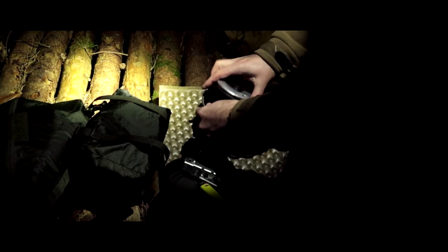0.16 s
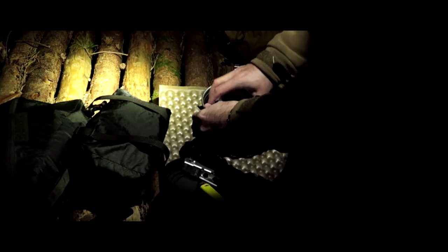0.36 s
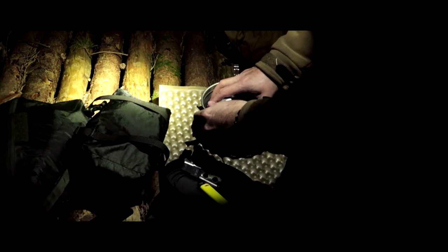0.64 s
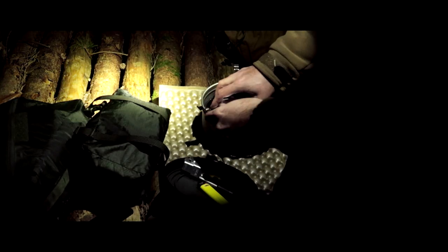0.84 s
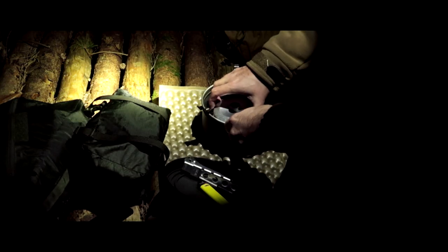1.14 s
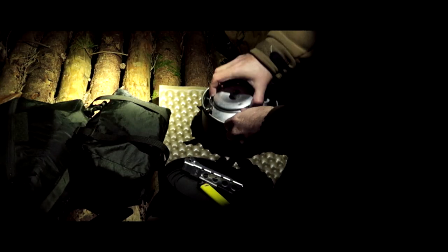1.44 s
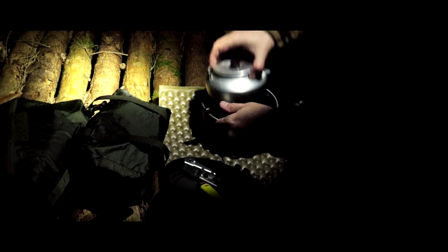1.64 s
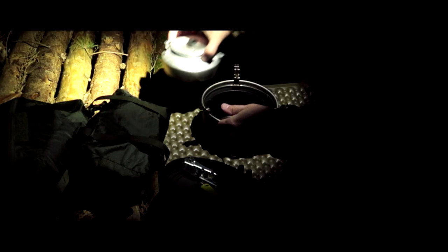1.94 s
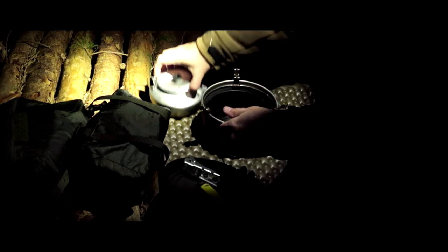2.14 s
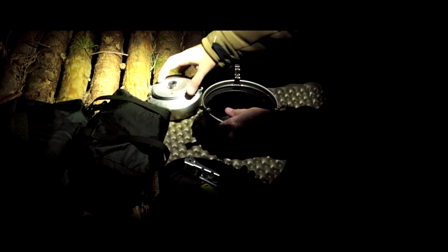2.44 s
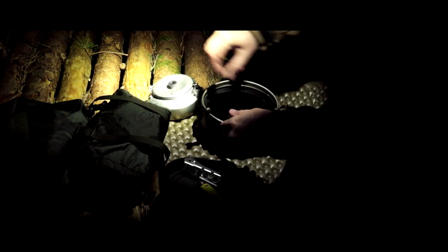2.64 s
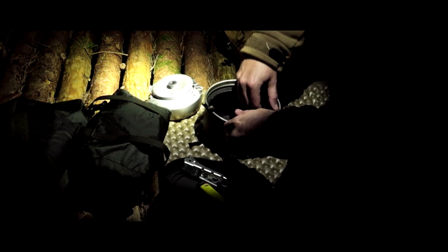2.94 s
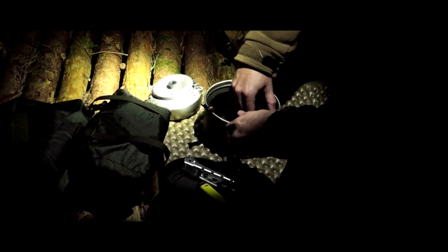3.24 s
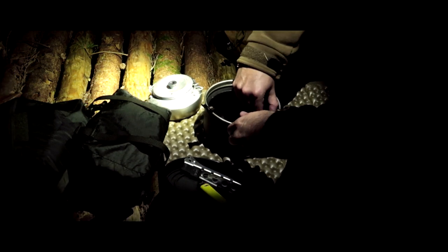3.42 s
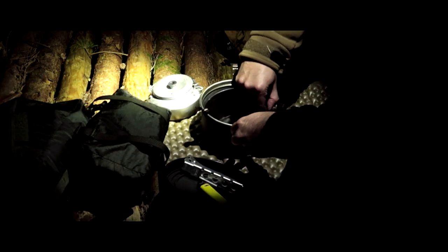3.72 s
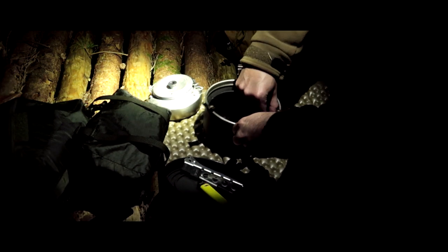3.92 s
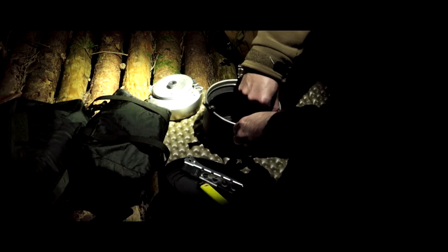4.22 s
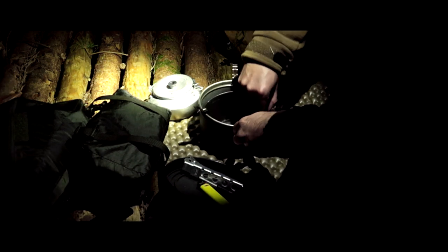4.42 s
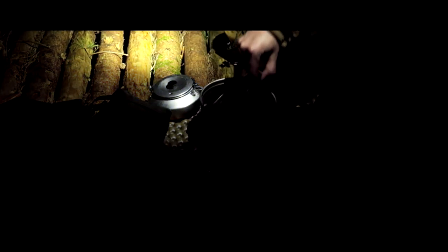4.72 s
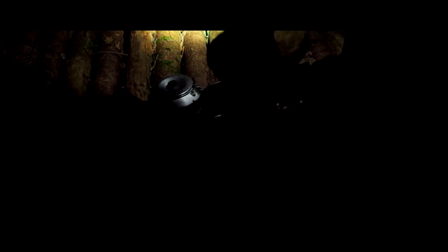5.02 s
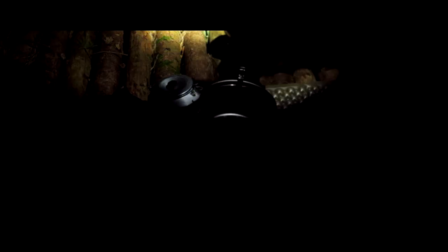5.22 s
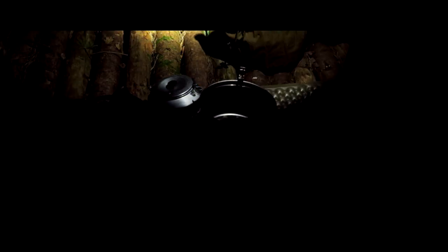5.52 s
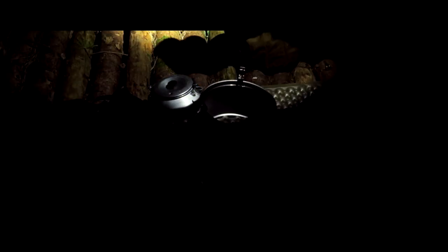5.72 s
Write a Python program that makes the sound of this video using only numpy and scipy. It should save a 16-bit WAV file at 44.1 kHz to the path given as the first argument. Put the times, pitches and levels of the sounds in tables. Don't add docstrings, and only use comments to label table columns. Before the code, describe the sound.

Close metallic clinks and scrapes with sleeve rustle, a kettle set down, a stove pried loose and clanging sharply against a pot, over quiet hiss.

```python
import sys
import numpy as np
from scipy import signal
from scipy.fft import rfft, irfft, next_fast_len
from scipy.io import wavfile

SR = 44100
rng = np.random.default_rng(int(sys.argv[2]) if len(sys.argv) > 2 else 0)


def level_to_linear(level):
    exponent = np.asarray(level, float) / 20
    return 10 ** exponent


def unload_audio(sound):
    columns = np.transpose(np.atleast_2d(sound))
    steps = np.round(np.clip(columns, -1, 1) * 32767)
    wavfile.write(sys.argv[1], SR, steps.astype(np.int16))


N = 258426
TAIL = 2 * SR // 5

# (time [s], peak [dB], favoured pitch [Hz], low body re peak [dB], sparkle re peak [dB])
KETTLE_HITS = [(.007, -36, 2090, -10, -22), (.042, -41, 2600, -34, -23), (.098, -47, 2000, -17, -9),
               (.251, -39, 1500, -14, -15.5), (.475, -48.5, 1020, 8, -12), (.504, -20, 1880, -14.5, -6.5),
               (.531, -32, 1570, -4.5, -30), (.538, -35, 3050, -8, -25), (.6925, -12, 1600, -4.5, -24),
               (.7, -15.5, 1500, 0.5, -22.5), (.716, -26, 1500, -3, -17), (.731, -34, 1200, 0, -35),
               (.742, -32.5, 1040, -5, -41), (.776, -38.5, 1030, 11, -38), (.797, -57, 1020, 21, -20),
               (1.213, -56.5, 1020, 16.5, -16), (1.284, -46, 1020, -6, -36), (1.431, -38.5, 1020, -5, -35),
               (1.454, -37, 1010, 0, -40), (1.494, -34, 1950, -10, -38), (1.518, -36.5, 2140, -15, -40),
               (2.248, -16, 1950, -6, -13), (2.264, -24, 1380, -4, -16), (2.274, -24.5, 1600, -8.5, -15),
               (2.285, -26, 1640, -1.5, -18), (2.298, -21.5, 1700, -7.5, -22),
               (2.462, -35, 1050, -0.5, -26), (2.478, -20.5, 1810, -11.5, -21),
               (2.495, -11.5, 2680, -10, -13), (2.535, -34.5, 2200, 4.5, -16),
               (2.542, -14.5, 1900, -13, -20)]
# (time [s], peak [dB], favoured pitch [Hz], low body re peak [dB])
STOVE_HITS = [(2.889, -56, 810, -18), (2.921, -41, 2060, -26), (2.958, -39, 2380, -4),
              (3.044, -31.5, 1600, -12.5), (3.083, -28.5, 1550, -8.5), (3.11, -31.5, 1230, -38),
              (3.169, -34.5, 1740, -14), (3.197, -30, 2040, -35), (3.212, -28, 1990, -10),
              (3.254, -37.5, 810, -31), (3.309, -60, 748, -19), (3.409, -40, 900, 1.5),
              (3.413, -31, 2080, -16), (3.441, -39, 1990, -27), (3.477, -27, 2000, -14),
              (3.517, -32.5, 2570, -16.5), (3.539, -41.5, 2480, -34), (3.764, -45, 720, -3),
              (3.833, -38, 1440, -16), (3.885, -38, 810, -26), (3.915, -36, 1010, -28),
              (3.929, -36, 2450, 0.0), (3.975, -39, 1100, -27), (4.019, -47, 2070, -28),
              (4.132, -28, 2450, -22), (4.165, -29.5, 2340, -37), (4.195, -39, 2240, -17),
              (4.207, -40.5, 2080, -21), (4.346, -44, 703, -6)]
# (time [s], peak [dB], favoured pitch [Hz], low body re peak [dB], sparkle re peak [dB])
POT_HITS = [(4.701, -23.5, 2060, -11, -14.5), (4.731, -8, 2100, -13, -22), (4.736, -4, 2780, -18, -21.5),
            (4.7425, -9.5, 3000, -21, -18), (4.77, -30, 2000, -15.5, -2), (4.777, -9, 1920, -18, -15),
            (4.782, -4.5, 2380, -18, -14.5), (4.789, -23, 2600, -28.5, -0.5), (4.802, -28, 2150, -14, -6),
            (4.824, -37, 2120, -19, -5), (4.838, -34.5, 2100, -18, -2), (4.86, -34.5, 1800, -20, -2.5),
            (4.865, -22, 2400, -38, -19.5), (4.9, -39, 3500, -32, -15), (4.91, -27, 3670, -37, -12),
            (4.934, -36, 2900, -26, -31), (5.021, -39, 3000, -29, -19)]
# (time [s], peak [dB], favoured pitch [Hz], low body re peak [dB])
KNOCKS = [(1.014, -39, 1530, -36), (1.329, -21, 1120, -33), (1.392, -35.5, 1020, -5.5),
          (3.184, -25.5, 1310, -14.5), (3.637, -31, 1350, -32), (3.716, -29, 2080, -7),
          (3.794, -31.5, 855, -7), (3.897, -16, 1080, -9), (3.954, -6.5, 2250, -23.5),
          (4.125, -21.5, 1550, -13.5), (4.231, -30.5, 1370, -15), (4.517, -18, 1310, -29),
          (4.659, -23.5, 2160, -21)]
# (time [s], peak [dB], sparkle re peak [dB])
ARM_HITS = [
    (5.131, -45.5, -40),
    (5.199, -39.5, -15),
    (5.222, -30.5, -9),
    (5.244, -36, -38),
    (5.267, -34, -14),
    (5.306, -36, -11),
    (5.326, -43, -34),
]

# (frequency [Hz], level [dB], T60 [s])
KETTLE_MODES = [(333, -8, 0.028), (372, 3.5, 0.037), (423, -4.5, 0.036), (806, -23, 0.1),
                (1430, -23.5, 0.044), (1990, 1, 0.026), (2190, 2, 0.056), (1092, -9, 0.032),
                (3057, 1.5, 0.053), (3990, -10, .07), (4830, 16, 0.081), (5420, 18, 0.085),
                (6670, -11, 0.069), (7440, -24, 0.044), (4520, 24, 0.06), (10100, 12.5, 0.11)]
STOVE_MODES = [(380, -4, 0.024), (597.4, -7, 0.14), (830, 14, 0.037), (1074, 0.5, 0.23), (1180, -21, 0.044),
               (1440, 6, 0.05), (1700, -2, 0.051), (2080, 18, 0.083), (2480, 19, 0.055), (3027, 11, 0.1),
               (3800, -21, .04), (4650, 27, 0.05), (5380, 25, 0.079), (6000, 25, .05), (6450, -4, 0.05),
               (6640, -25, 0.058)]
POT_MODES = [(347, -5.5, 0.035), (603, -3, 0.13), (830, -16, .06), (1085, -12.5, .1), (1150, -7, 0.064),
             (1750, 8.5, 0.29), (1900, 9, 0.074), (2136, 23.5, 0.035), (2160, 16, 0.095),
             (2420, -5.5, 0.071), (2600, 16, 0.063), (3060, -3, 0.047), (3050, 2, 0.083), (2880, 6, 0.037),
             (3400, 26, 0.036), (3260, -2.5, 0.08), (3930, 31, 0.015), (4810, 19, 0.24), (5840, 20.5, 0.11),
             (5420, 14.5, 0.14), (5300, 16.5, 0.13)]
GRIPPED_MODES = [(386, 3, 0.029), (617, 2.5, 0.099), (845, -51, 0.026), (1086, -16, 0.044),
                 (1230, 1, 0.024), (1472, 7, 0.025), (1720, 10.5, 0.0092), (2080, 14.5, 0.0083),
                 (2480, 2.5, 0.025), (3000, -3, 0.025), (4400, -2.5, 0.054), (5470, 20, 0.031)]
ARM_MODES = [(442, 0, 0.078), (1520, 6, 0.077), (2218, 6, 0.06), (2912, 4, 0.099), (3070, -7, .06),
             (3800, -1, 0.074), (4620, 22, .04), (5400, 22, .03), (6030, 34, 0.035), (6255, 17, .04),
             (8380, -3, .04), (9400, 1, 0.036)]
BAND_EDGES_HZ = [250, 700, 4000, 15000]
CROWD_T60_S = [0.06, 0.014, 0.016]
KETTLE_CRACK_DB = [-18.5, 0.5, 0.5]

# (time [s], peak [dB], frequency [Hz], until
# choked [s])
HELD_RINGS = [(.007, -38.5, 2190, 0.011), (.042, -38.5, 3190, 0.0071), (.043, -36, 2170, 0.013),
              (.505, -24, 1440, 0.0066), (.508, -24, 3150, 0.008), (.519, -39, 3320, 0.0048),
              (.504, -32.5, 5420, 0.0097), (.507, -31, 4660, 0.0067), (.51, -40, 6675, .015),
              (.694, -22, 734, 0.023), (.693, -20, 2190, 0.022), (.693, -22.5, 3204, 0.013),
              (.697, -27.5, 4587, 0.0054), (.697, -11, 370, 0.012), (2.249, -14, 3000, 0.0014),
              (2.249, -16.5, 464, 0.0029), (2.252, -21, 1360, .004), (2.254, -27, 4624, 0.0027),
              (2.265, -24, 3090, 0.017), (2.273, -21, 2200, 0.021), (2.301, -25, 2208, .011),
              (2.479, -30, 3080, .014), (2.495, -10.5, 2206, 0.0054), (2.495, -11, 3075, 0.0081),
              (2.497, -13, 353, 0.015), (2.513, -31, 2213, 0.012), (2.499, -28, 4820, 0.032),
              (2.542, -16.5, 2213, 0.013), (2.542, -20, 3034, 0.014), (3.714, -42, 710, 0.016),
              (3.764, -40, 707, 0.0074), (3.898, -18.5, 830, 0.029), (3.912, -23, 985, 0.021),
              (3.976, -39.5, 3020, 0.01), (4.521, -36, 1724, 0.043), (4.731, -9, 1910, .004),
              (4.7755, -4, 1930, 0.003), (4.782, -15, 5420, 0.0024), (4.866, -23.5, 3550, 0.015),
              (4.91, -30, 3720, .014), (5.018, -43, 2940, 0.028),
              (1.21, -36, 380, 0.016), (1.331, -29, 1180, 0.0087), (1.528, -50, 2800, .04),
               (1.355, -40.5, 1240, .05), (1.464, -35, 370, .008), (1.478, -31.5, 370, 0.0084),
               (1.331, -37, 1900, .005), (2.274, -21.5, 400, 0.014), (2.299, -25, 400, 0.016),
               (3.637, -35, 930, 0.004), (3.087, -34.5, 1222, 0.047), (3.087, -34, 312, 0.032),
               (3.197, -45, 5400, 0.033), (3.2, -40, 3050, 0.022), (3.415, -46.5, 6450, .01),
               (3.414, -46, 5400, .008), (3.484, -46.5, 5380, .022), (3.638, -36, 1450, .005),
               (3.795, -40.5, 1440, 0.011), (4.131, -42, 5400, 0.0062), (4.165, -45, 5400, .018),
               (4.169, -42, 4650, .015), (4.195, -40, 2150, .02), (4.519, -35.5, 603, 0.044),
               (4.518, -30, 1120, .012), (4.665, -49, 2000, .035), (4.78, -10.5, 2600, 0.012),
               (4.857, -29.5, 1664, 0.012), (4.81, -27, 2143, .04), (5.223, -30.5, 2912, .014),
               (5.31, -42, 2218, 0.026), (4.862, -30, 2150, .028), (4.864, -33, 2900, .035),
               (4.912, -36, 2950, .04), (4.79, -24, 1750, .015), (2.495, -25, 1770, .006),
               (2.287, -30, 3050, .018), (3.794, -38, 2100, .004)]
# (time [s], peak [dB], frequency [Hz])
FREE_RINGS = [(.515, -48, 8600), (1.522, -46, 1170), (3.086, -34, 597), (3.086, -43, 1977),
              (3.96, -37, 1085), (4.734, -23, 1751), (4.735, -23, 3385), (4.78, -20, 1706),
              (4.778, -24, 2066), (4.737, -35, 2780), (4.83, -36, 2700), (4.785, -39, 4172),
              (4.8, -25, 605), (4.79, -20, 2145), (4.91, -55, 15130), (4.92, -46, 3548), (4.742, -35, 4086),
              (4.735, -21.5, 1077), (4.735, -18, 603), (4.81, -36, 3045), (4.8, -33, 2526),
              (4.79, -44.5, 3553), (4.91, -43, 2073), (.235, -48, 2150)]
# (time [s], peak [dB], frequency [Hz])
LAST_RINGS = [
    (4.918, -49, 773),
    (4.911, -42, 1702),
    (4.87, -43, 2525),
]

# (time [s], length [s], level [dB rms], pitch [Hz])
SCRAPES = [(.01, 0.19, -48.5, 2180), (0.075, .09, -58, 5300), (0.452, 0.11, -45.5, 2000),
           (0.783, 0.38, -52.5, 1940), (2.24, 0.08, -36, 1860), (2.872, 0.17, -57, 2180),
           (2.875, 0.036, -57, 5050), (3.08, 0.054, -49, 1800), (3.183, 0.082, -49, 2000),
           (3.193, 0.056, -50.5, 5400), (3.403, 0.068, -54, 3200), (3.466, 0.052, -50, 3000),
           (3.71, 0.17, -52, 1960), (3.984, 0.078, -49, 2000), (4.144, .045, -47, 2380),
           (4.405, 0.14, -49.5, 2120), (4.534, 0.13, -47, 2260), (4.742, 0.049, -36, 2000),
           (4.791, .099, -41, 2000), (4.819, 0.054, -38.5, 6000), (4.88, .059, -40.5, 2200),
           (4.908, .016, -34, 8000), (3.893, 0.05, -38, 1750), (3.953, 0.015, -39, 5050),
           (0.501, .016, -31, 1100), (1.328, 0.016, -42, 1800), (4.727, .025, -23, 4300),
           (4.78, 0.023, -27, 4300), (3.165, 0.014, -51, 3000), (2.49, 0.012, -28, 1700),
           (5.204, 0.17, -57, 3400)]
# (time [s], peak [dB], frequency [Hz])
THUMPS = [(1.33, -35, 148), (2.226, -15, 183), (2.258, -23, 200), (3.044, -31, 186), (3.208, -26, 173),
          (3.476, -27, 226), (4.725, -25.5, 210), (4.842, -21, 262), (4.858, -21.5, 205),
          (4.865, -25, 123.6), (4.97, -33, 147)]
# (time [s], level [dB])
RUSTLE = [(0.0, -43), (.24, -52.5), (.5, -49.5), (.67, -45), (.86, -46), (1.06, -62.5), (1.48, -40),
          (1.65, -55), (2.94, -53), (3.08, -47), (3.23, -51), (3.56, -55.5), (4.51, -51), (4.63, -46.5),
          (4.73, -36), (4.85, -32), (4.99, -56.5), (5.86, -55.5)]
# (frequency [Hz], density [dB per Hz])
CLOTH = [(120, -30), (200, 6), (322, 4.5), (465, -1.5), (671, -4), (950, -11), (1060, -6), (2090, 0),
         (12600, -35), (16000, -30)]

# (frequency [Hz], density [dB per Hz])
NIGHT = [(15, -46.5), (25, -12.5), (53, -11), (70, -16), (92, -3), (124, -4.5), (142, -11.5), (357, -7.5),
         (507, -14), (684, -10), (2260, -25), (4100, -23.5), (14300, -40), (16300, -68)]
# (frequency [Hz], level [dB rms])
HUM = [(50, -62), (100, -58.5), (151, -62), (201, -69.5)]
# (time [s], peak [dB])
TICKS = [
    (1.119, -41),
    (1.88, -42),
    (5.399, -51),
]
# (frequency [Hz], side re mid [dB])
WIDTH = [(60, -20), (110, -54), (200, -35), (380, -43), (700, -45.5), (1290, -30), (2380, -24.5),
         (4400, -7), (8120, 0), (15000, -3)]
# (frequency [Hz], side re mid [dB])
NIGHT_WIDTH = [(60, -40.5), (110, -11), (200, -2.5), (380, 1), (700, -4), (1290, 1.5), (2380, 5), (4400, 0),
               (8120, 1), (15000, -2.5)]
# (frequency [Hz], gain [dB])
PRESENCE = [(5500, 0), (8000, -3.5), (12500, 2.5), (14800, -3), (16000, -14)]


def kettle():
    return struck(KETTLE_HITS, KETTLE_MODES, treble_hz=[4000, 8000], crack_db=KETTLE_CRACK_DB,
                  band_db=[-1.1, -3, -6], focus_db=1.5, reach=[2.4, 1.45], chatter_s=0.017)


def stove():
    rim_hz, rim_sparkle_db, sparkle_db_per_octave, faintest_db = 2270, -19, 15.5, -62
    hits = []
    for s, db, hz, low in STOVE_HITS:
        sparkle = rim_sparkle_db + sparkle_db_per_octave * np.log2(hz / rim_hz)
        hits.append((s, db, hz, low, max(sparkle, faintest_db - db)))
    return struck(hits, STOVE_MODES, treble_hz=[3600, 7500], crack_db=[-5, 1.1, 5],
                  band_db=[-2.1, -4, -6], focus_db=3.5, reach=[2.4, 1.5], chatter_s=0.023)


def pot():
    return struck(POT_HITS, POT_MODES, treble_hz=[4000, 9000], crack_db=[-3, 2.5, 5],
                  band_db=[-3, -4, -7], focus_db=13.0, reach=[2.3, 1.5], chatter_s=0.027)


def gripped_knocks():
    tick_db, hard_re_peak_db = -67.5, -37.5
    hits = [(s, db, hz, low, max(tick_db - db, hard_re_peak_db)) for s, db, hz, low in KNOCKS]
    return struck(hits, GRIPPED_MODES, treble_hz=[3500, 6500], crack_db=[-3, -3, 6],
                  band_db=[-3, -2.1, -7], focus_db=18.0, reach=[1.8, 2.1], chatter_s=0.017)


def folding_arms():
    pitch_hz, low_db = 2900, -15
    hits = [(s, db, pitch_hz, low_db, sparkle) for s, db, sparkle in ARM_HITS]
    return struck(hits, ARM_MODES, treble_hz=[4300, 9000], crack_db=[3, 3, 4],
                  band_db=[-5, -3, -4], focus_db=9.0, reach=[1.5, 1.4], chatter_s=0.025)


def struck(hits, modes, treble_hz, crack_db, band_db, focus_db, reach, chatter_s):
    treble_t60_s, fade_curve, scatter_db, body_top_hz = 0.033, 0.91, 3, 3540
    first_touch = [32, 15, 6.4]
    rises_s = [.0008, .0004, .0025]
    out, burst = np.zeros(N + TAIL), SR // 10
    t = np.arange(burst) / SR
    hz, level_db, t60 = np.transpose(modes)
    band_of = np.searchsorted(BAND_EDGES_HZ, hz) - 1
    t60 = np.where(band_of == 2, np.minimum(t60, treble_t60_s), t60)
    rings = ring(hz, t60)[:, :TAIL // 3]
    draws = rng.standard_normal((len(hits), 4 * burst + len(modes)))
    lengths = np.minimum(chatter_s, np.diff([hit[0] for hit in hits], append=N / SR))
    for (s, peak_db, focus_hz, low, sparkle), length, draw in zip(hits, lengths, draws):
        at = round(s * SR)
        touches, *grits = draw[:4 * burst].reshape(-1, burst)
        fade = level_to_linear(-20 * (t / np.clip(length, .002, .06)) ** fade_curve)
        favour = -focus_db * np.abs(np.log2(hz / focus_hz)) * (band_of == 1)
        strength = level_to_linear(level_db + favour + scatter_db * draw[4 * burst:])
        body_hz = [focus_hz / reach[0], min(focus_hz * reach[1], body_top_hz)]
        edges = [[300, 600], body_hz, treble_hz]
        for k, relative_db in enumerate([low, -9, sparkle]):
            impacts = touches * np.abs(touches) * fade * (1 - np.exp(-t / rises_s[k]))
            impacts[round(rises_s[k] * SR)] += first_touch[k]
            tone = signal.fftconvolve((strength * (band_of == k)) @ rings, impacts)
            if k < 2:
                tone = filtered(tone, 5, 1.14 * edges[k][1], "low")
            crowd = signal.fftconvolve(grits[k] * level_to_linear(-60 * t / CROWD_T60_S[k]), impacts)
            crack = filtered(crowd, [2, 4, 1][k], edges[k], "band")
            crack = np.pad(crack, (0, len(tone) - len(crack)))
            mix = onset_levelled(tone) + level_to_linear(crack_db[k]) * onset_levelled(crack)
            out[at:at + len(tone)] += level_to_linear(peak_db + relative_db + band_db[k]) * mix
    return filtered(out[:N], 5, 285, "high")


def onset_levelled(x):
    return x / np.sqrt(np.mean(x[:SR // 60] ** 2) + 1e-30)


def singing():
    held_t60_s, free_t60_s, last_cycles = 0.12, 0.22, 820
    wobble_depth_db, wobble_hz = 2.5, 130
    rows, wobble = HELD_RINGS, drift(wobble_hz)
    starts = np.arange(len(rows)) * 3391 % (N - TAIL)
    wobble_db = [wobble_depth_db * wobble[at:at + TAIL] for at in starts]
    held_rows = [(s, db, hz, held_t60_s, free_s) for s, db, hz, free_s in rows]
    held = pings(held_rows, rise_s=0.0011, wobble_db=wobble_db)
    free_rows = [(*row, free_t60_s) for row in FREE_RINGS]
    last_rows = [(s, db, hz, last_cycles / hz) for s, db, hz in LAST_RINGS]
    free = pings(free_rows + last_rows, rise_s=0.0042)
    return filtered(held + free, 2, 180, "high")


def pings(rows, rise_s, wobble_db=None):
    choke_t60_s = 0.029
    out, t = np.zeros(N + TAIL), np.arange(TAIL) / SR
    for k, (s, peak_db, hz, t60, *free_s) in enumerate(rows):
        at = round(s * SR)
        change_db = 0
        if free_s:
            change_db = wobble_db[k] - 60 * np.maximum(t - free_s[0], 0) / choke_t60_s
        onset = 1 - np.exp(-t / rise_s)
        out[at:at + TAIL] += level_to_linear(peak_db + 2.0 + change_db) * ring(hz, t60)[0] * onset
    return out[:N]


def ring(hz, t60):
    t = np.arange(TAIL) / SR
    return np.sin(2 * np.pi * np.outer(hz, t)) * level_to_linear(-60 * t / np.reshape(t60, (-1, 1)))


def scrapes():
    span_ratio = 1.62
    out, t = np.zeros(N), np.arange(N) / SR
    grains = rng.standard_normal(N) * level_to_linear(drift(60))
    for s, length, db, hz in SCRAPES:
        span = slice(round(s * SR), round((s + length) * SR))
        band = filtered(grains[span], 2, [hz / span_ratio, hz * span_ratio], "band")
        swell = np.sin(np.pi * np.clip((t[span] - s) / length, 0, 1))
        out[span] += level_to_linear(db) * rms_one(band) * swell
    return out


def thumps():
    mat_t60_s = 0.05
    knock = [(*row, mat_t60_s) for row in THUMPS]
    push = [(s, db - 16.0, hz / 2.6, 3.7 * mat_t60_s) for s, db, hz in THUMPS]
    return pings(knock, rise_s=0.0022) + pings(push, rise_s=0.026)


def rustle():
    s, level_db = np.transpose(RUSTLE)
    sizes = level_to_linear(1.2 * np.minimum(rng.exponential(1, N), 5)) * rng.choice([-1, 1], N)
    slips_per_s = 6000 * level_to_linear(4 * drift(25))
    slips = sizes * (rng.random(N) < slips_per_s / SR)
    gain_db = np.interp(np.arange(N) / SR, s, level_db) - 3.5
    return level_to_linear(gain_db) * rms_one(coloured(slips, CLOTH))


def spread(near):
    quadrature = np.imag(signal.hilbert(near, next_fast_len(N)))[:N]
    return coloured(quadrature * (.3 + 0.32 * drift(150)), WIDTH)


def night():
    night_db, hum_waver_db, hum_wander_rad = -49.5, .4, .8
    tick_hz, tick_t60_s = 4050, .03
    t = np.arange(N) / SR
    mid, side = coloured(rng.standard_normal((2, N)), NIGHT)
    gain = level_to_linear(night_db - 2.5 + drift(9.0)) / np.std(mid)
    floor = np.array([mid, coloured(side, NIGHT_WIDTH)]) * gain
    for hz, db in HUM:
        level = np.sqrt(2) * level_to_linear(db + hum_waver_db * drift(4.3))
        floor[0] += level * np.sin(2 * np.pi * hz * t + hum_wander_rad * drift(4))
    floor[0] += pings([(*tick, tick_hz, tick_t60_s) for tick in TICKS], rise_s=0.0033)
    return floor


def drift(rate_hz):
    r = np.exp(-2 * np.pi * rate_hz / SR)
    return rms_one(signal.lfilter([1], [1, -2 * r, r * r], rng.standard_normal(N + SR))[SR:])


def coloured(x, points):
    hz, db = np.transpose(points)
    bins = np.maximum(np.fft.rfftfreq(x.shape[-1], 1 / SR), 1)
    return irfft(rfft(x) * level_to_linear(np.interp(np.log(bins), np.log(hz), db)), x.shape[-1])


def filtered(x, order, edge_hz, kind):
    return signal.sosfilt(signal.butter(order, edge_hz, kind, fs=SR, output="sos"), x)


def rms_one(x):
    return x / np.sqrt(np.mean(x ** 2) + 1e-20)


def scene():
    near = kettle() + stove() + pot() + gripped_knocks() + folding_arms()
    near += singing() + scrapes() + thumps() + rustle()
    near = coloured(near, PRESENCE)
    mid, side = night() + np.array([near, spread(near)])
    return np.array([mid + side, mid - side])


def roll_off(x):
    return signal.sosfilt(signal.butter(12, 16480, fs=SR, output="sos"), x)


def record(dry):
    heard = filtered(np.clip(dry, -1, 1), 9, [26, 15300], "band")
    return roll_off(np.clip(heard, -1, 1))


dry = scene()
out = record(dry)
unload_audio(out)
```